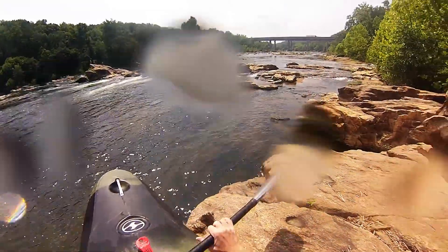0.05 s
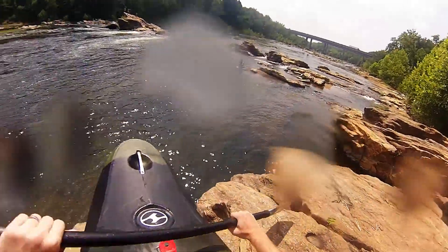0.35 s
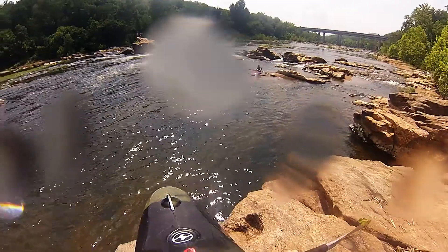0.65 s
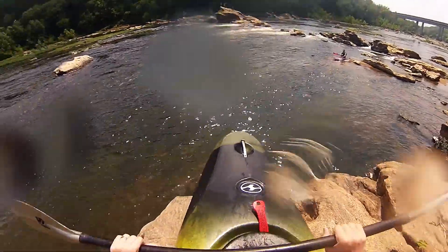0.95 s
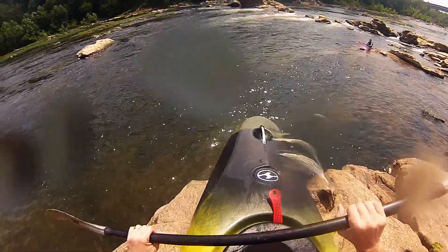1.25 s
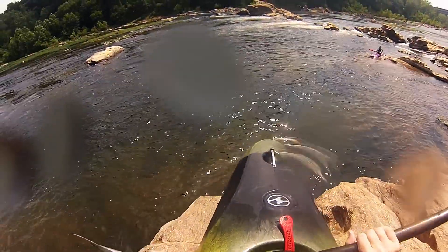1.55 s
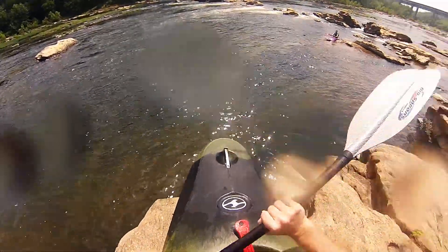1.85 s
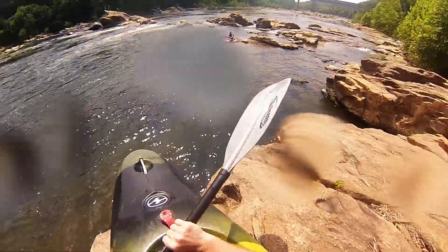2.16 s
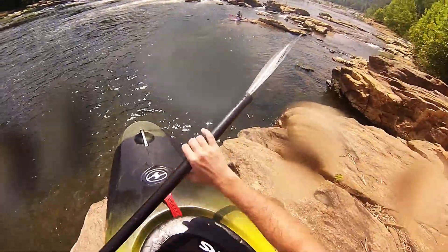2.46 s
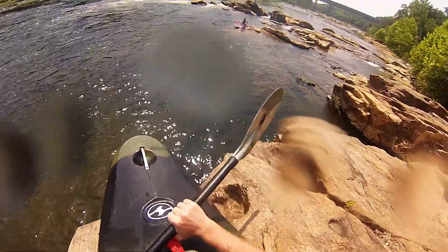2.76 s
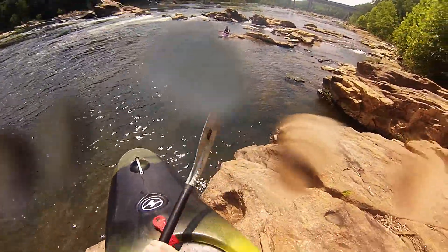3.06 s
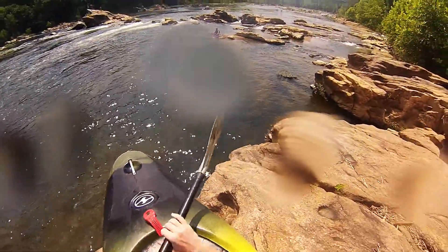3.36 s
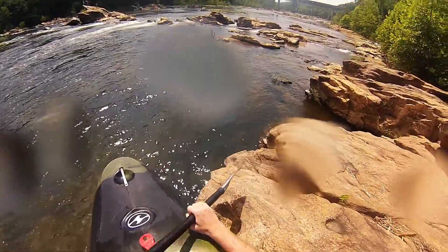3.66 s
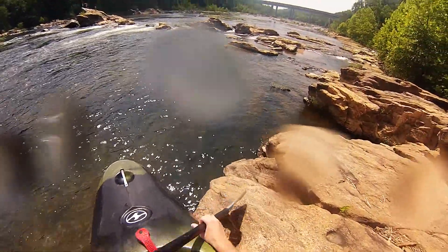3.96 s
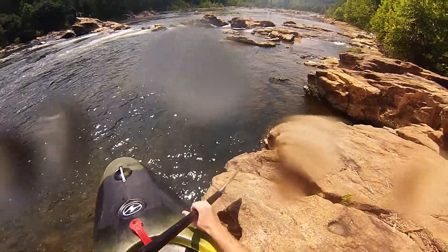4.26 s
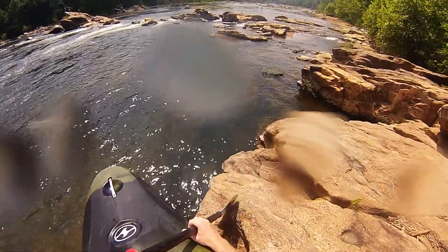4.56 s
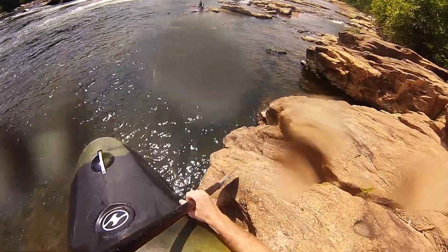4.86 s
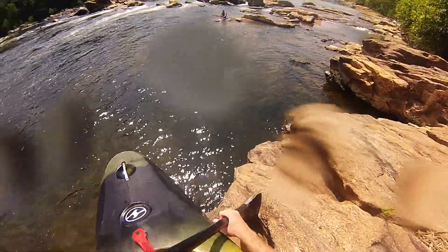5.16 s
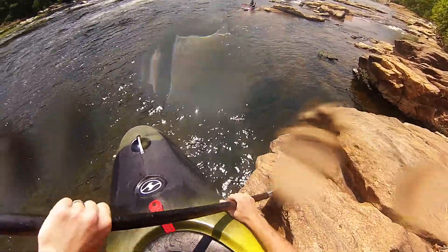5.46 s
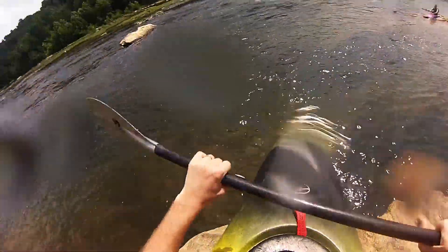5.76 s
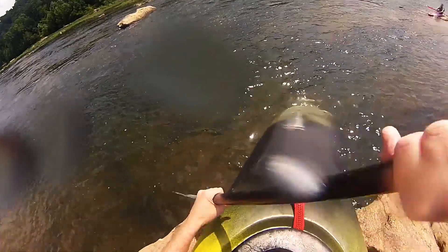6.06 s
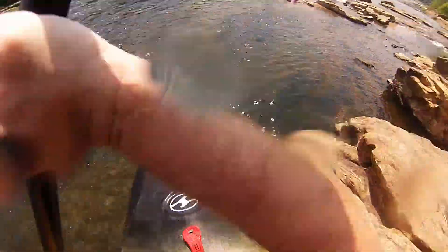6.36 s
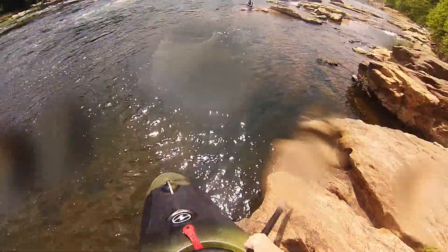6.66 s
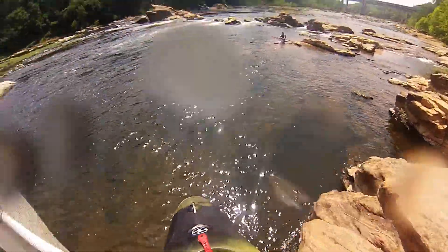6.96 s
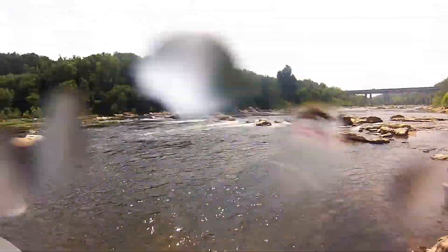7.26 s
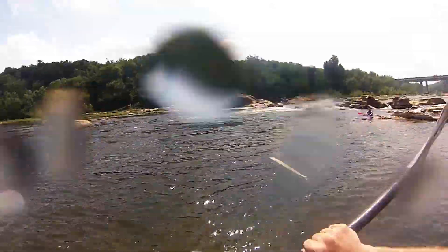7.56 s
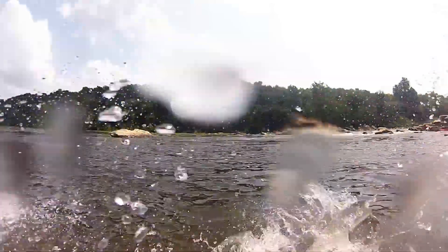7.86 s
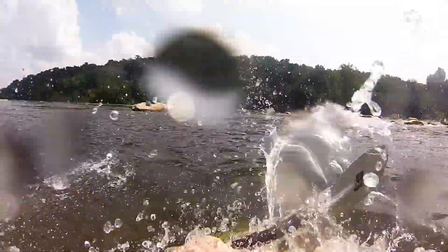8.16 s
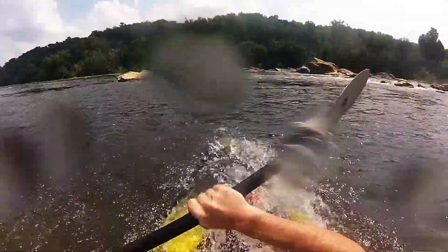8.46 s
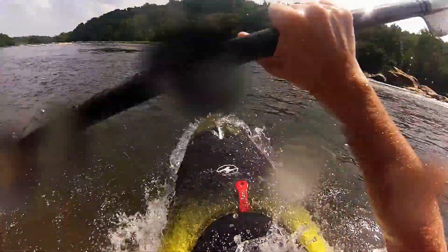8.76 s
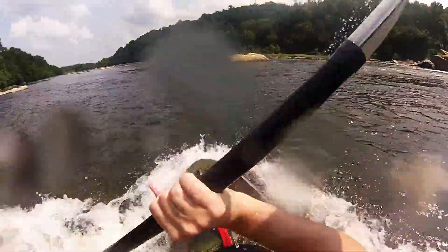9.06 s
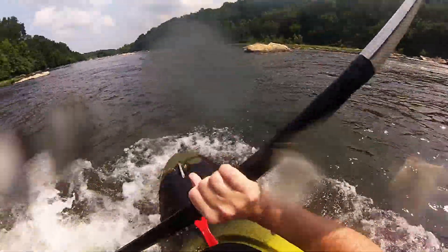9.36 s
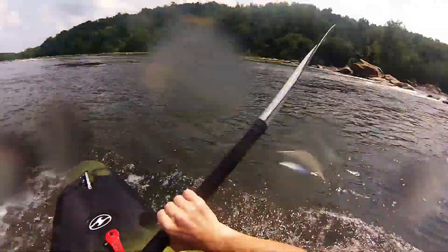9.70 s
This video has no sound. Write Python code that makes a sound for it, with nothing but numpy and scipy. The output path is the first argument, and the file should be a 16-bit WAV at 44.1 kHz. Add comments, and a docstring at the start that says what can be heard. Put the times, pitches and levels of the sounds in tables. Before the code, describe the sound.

Distant rapids rush steadily while wind rumbles on a close, boxy-sounding microphone. A paddle knocks and scrapes on a rock ledge in scattered clusters, with dull bumps. The knocks quicken as the plastic kayak grinds off the edge. Wind surges, and the boat hits the river with a loud splash, spray rapping on the microphone's case. The churned water foams and begins to settle.

```python
"""A plastic kayak is shoved off a rock ledge into a river, heard from a waterproof case on the paddler.
At first distant rapids rush and eddies of wind rumble on the case. The paddle knocks and scrapes on the
rock and the hull grinds along: impact and friction excite the damped modes of shaft, blade and hull.
Near 7.5 s the boat drops, the airflow peaks, and spray pelts the case and sets it ringing.
Last, the churned water foams with droplets and resonating bubbles, and settles."""
import sys
import numpy as np
from scipy import signal
from scipy.fft import rfft, irfft, next_fast_len
from scipy.io import wavfile

SR = 44100
rng = np.random.default_rng(int(sys.argv[2]) if len(sys.argv) > 2 else 0)


def master_out(mix):
    """Clip the mix to full scale and print it as 16-bit PCM to the path in sys.argv[1]."""
    frames = np.transpose(np.atleast_2d(mix))
    ceiling = np.clip(frames, -1, 1)
    pcm = np.round(ceiling * 32767).astype(np.int16)
    wavfile.write(sys.argv[1], SR, pcm)


N = 433503
TIME = np.arange(N) / SR

# Levels in the tables are relative; each source applies its own gain.
# blows on the rock: t/s, favoured shaft f/Hz, favoured blade f/Hz, level/dB of hull, shaft, blade, grit
KNOCKS = [(0.512, 1170, 2440, -58, -37, -41.5, -56.5), (0.604, 1290, 1920, -40, -46, -59, -67),
          (1.803, 1280, 2460, -59, -40, -42, -50.5), (1.933, 1220, 2310, -63, -38.5, -48, -49.5),
          (1.981, 930, 2180, -57, -40, -49, -50.5), (2.813, 1590, 2260, -45.5, -46.5, -53, -57),
          (2.874, 1030, 2260, -41, -34.5, -49, -51), (3.068, 1340, 2550, -68, -45.5, -50, -50.5),
          (3.172, 654, 2060, -58, -53, -62, -62), (4.645, 1120, 2050, -51, -36.5, -47, -63),
          (4.995, 1190, 2020, -44.5, -26, -31.5, -45.5), (5.041, 1160, 2060, -67, -44, -48, -63),
          (5.067, 1130, 2100, -65, -39, -45, -60), (5.084, 1110, 2180, -52, -43, -53, -69),
          (6.207, 1515, 2023, -46.5, -33, -34.5, -43.5), (6.31, 654, 2430, -49, -39.5, -40, -47.5),
          (6.418, 1590, 2410, -54, -34.5, -34, -41), (6.79, 1200, 2174, -46.5, -34, -42, -51),
          (6.941, 1149, 2090, -55, -36.5, -40, -52), (7.1, 1360, 3080, -55, -32, -32.5, -38)]
# slides on the rock: t/s, length/s, then frequencies and levels as for the blows
SCRAPES = [(1.816, 0.076, 1060, 2300, -70, -50, -54, -57), (1.885, 0.023, 1160, 2300, -64, -41, -41, -46.5),
           (1.983, 0.041, 930, 2170, -62, -47.5, -55, -57), (2.04, 0.085, 1500, 2170, -66, -62.5, -65, -69),
           (2.922, 0.081, 1627, 2297, -61, -44.5, -51, -49.5),
           (2.988, 0.04, 1290, 2300, -41.5, -47, -59, -64), (5.311, 0.14, 1150, 2100, -55, -57.5, -62, -74),
           (6.226, 0.063, 700, 2000, -51, -52, -57, -60), (6.312, 0.032, 1600, 2430, -55, -47, -46, -53),
           (6.363, 0.044, 1593, 2356, -52.5, -56, -47, -50), (6.415, 0.04, 1570, 2300, -56, -43, -42, -47),
           (6.458, 0.048, 1580, 2350, -58, -44, -37, -45),
           (6.819, 0.097, 1344, 2100, -48.5, -38, -39.5, -51),
           (6.967, 0.098, 1290, 2090, -55, -44, -47, -60), (7.17, 0.05, 1294, 2350, -59, -47, -53, -61),
           (7.234, 0.055, 1280, 2350, -40.5, -48.5, -47.5, -56),
           (7.3, 0.12, 1290, 2350, -66, -56, -60, -80)]
# modes of each part: f/Hz, bandwidth/Hz, level/dB
HULL_MODES = [(245, 220, -4.5), (323, 84, -4), (392, 77, -9.5), (634, 75, -8.5)]
SHAFT_MODES = [(706, 54, -6), (850, 57, -6), (929, 49, -6), (1071, 35, 0), (1149, 46, 0), (1299, 57, 1),
               (1423, 64, -2.5), (1602, 82, -4.5)]
BLADE_MODES = [(1932, 74, -1), (2091, 61, 4), (2332, 74, 1), (2570, 130, -0.5), (3140, 106, -7.5)]
GRIT_MODES = [(3320, 580, 1.5), (4220, 240, -1), (4730, 310, -2), (5750, 530, -6.5), (6420, 240, -4),
              (7840, 1500, -11), (11100, 2100, -18.5)]
CASE_MODES = [(1325, 184, -9), (1700, 114, -4), (2230, 178, 6.5), (2380, 247, 3.5), (3220, 190, -16.5)]
CASE_CRACK_MODES = [(6270, 550, -4), (7400, 610, -6.5), (11600, 1100, -19)]
PARTS = (HULL_MODES, SHAFT_MODES, BLADE_MODES, GRIT_MODES)
HULL_BOOM_HZ = 317  # the rock excites the hull most near here
# contact force on each part: rise/s, decay/s, knock gain/dB, scrape gain/dB
CONTACT = [(0.001, 0.0099, -2, -2), (0.00159, 0.0091, -4.5, 1.5), (0.00085, 0.0045, -3, -2),
           (0.00097, 0.0036, -3.5, -2)]
# water landing on the case: t/s, ring level/dB, slap level/dB, slap f/Hz, crack level/dB
DROPS = [(7.632, -27.5, -31, 1200, -41), (7.768, -16, -20, 600, -45), (7.7759, -10, -25, 900, -44),
         (7.784, -14, -34, 600, -45), (7.792, -5, -37, 700, -45), (7.7981, -19, -13, 570, -44),
         (7.7994, -2.5, -32, 830, -31), (7.813, -20, -40, 500, -50), (7.824, -21, -12, 460, -43),
         (7.83, -28, -23, 510, -45), (7.865, -25, -8, 322, -45), (7.867, -22, -15, 515, -41),
         (7.8772, -25, -15.5, 293, -38), (7.888, -16, -36, 400, -38), (7.894, -18.5, -37, 400, -32),
         (7.901, -25.5, -32, 800, -40), (8.001, -23.5, -42, 500, -45), (8.019, -28, -28.5, 200, -42),
         (8.18, -35, -28.5, 1510, -56), (8.3602, -13, -4, 1220, -15.5), (8.3608, 1, -24, 1790, -32),
         (8.374, -24, -51, 700, -33), (8.425, -16.5, -20, 453, -40), (8.428, -25, -22, 714, -44)]
# bow entry, hull landing, falling wave, foam: t/s, rise/s, hold/s, decay/s, wash level/dB, spray level/dB
SURGES = [(7.542, 0.068, 0.072, 0.066, -42.5, -55), (7.753, 0.018, 0.13, 0.03, -33, -49),
          (7.919, 0.092, 0.014, 0.011, -38.5, -50), (8.026, 0.28, 0.085, 0.35, -40.5, -52),
          (8.516, 0.12, 0.55, 0.38, -41, -52.5)]
# plinks and squeaks: t/s, level/dB, f/Hz
PLINKS = [(2.591, -47.5, 1284), (6.465, -44, 3550), (6.826, -51, 6700), (6.903, -30.5, 2075),
          (7.521, -43, 1160), (7.555, -35.5, 1250), (9.465, -45, 820)]
# dull bumps: t/s, level/dB, starting f/Hz, decay/s
BUMPS = [(1.251, -36, 93, 0.056), (2.355, -32, 103, 0.081), (2.78, -34.5, 85, 0.035),
         (3.43, -30.5, 87, 0.13), (4.326, -31.5, 192, 0.031), (4.467, -31, 97, 0.047),
         (5.537, -28, 138, 0.065), (7.248, -23, 129, 0.011), (7.28, -17.5, 134, 0.016),
         (7.454, -12, 104, 0.015), (7.685, -15, 97.5, 0.05), (7.822, -15, 260, .006),
         (7.865, -8, 228, 0.0075), (7.901, -12.5, 99, 0.033), (8.02, -10.5, 71, 0.011),
         (8.645, -24.5, 100, 0.05)]
# crackles of the case: t/s, level/dB
CRACKLES = [(7.196, -48), (7.255, -42), (7.286, -48), (7.426, -49), (7.435, -49), (7.458, -42.5)]
# airflow past the case: t/s, rumble level/dB
AIRFLOW = [(0.0, -30), (2.5, -30), (5.9, -29.5), (6.9, -21.5), (7.3, -16), (7.95, -15), (8.3, -18),
           (8.6, -27), (9.83, -33)]
# gusts: peak t/s, half width/s, rumble level/dB, flutter level/dB
GUSTS = [(0.41, 0.073, -22.5, -62), (0.7, 0.2, -27, -52), (1.94, 0.045, -22.5, -69),
         (2.96, 0.12, -23.5, -58), (4.0, 0.15, -24, -55), (5.0, 0.082, -22, -62), (5.4, 0.21, -24, -60),
         (6.27, 0.12, -18.5, -62), (6.43, 0.051, -9, -43), (7.16, 0.044, -13, -56), (7.268, 0.028, -7, -29),
         (7.46, 0.014, -7.5, -41), (7.7, 0.03, -17, -36), (7.86, 0.051, -13, -32), (8.02, 0.017, -7, -36),
         (8.3, 0.12, -22, -46), (8.43, 0.027, -13, -39), (8.74, 0.14, -23.5, -44), (9.23, 0.08, -30, -57)]
# the background level ducks briefly after a heavy low thump, then recovers: t/s, level/dB
BACKGROUND_DIP = [(7.3, -2.5), (7.46, 0.5), (7.48, -16), (7.505, -4), (7.53, -1)]
# noise spectra: f/Hz, density level/dB
WASH_SPECTRUM = [(88, -6), (170, -5), (260, -4), (380, -4), (550, -6), (900, -5), (1120, 0), (1290, 2.5),
                 (1500, -1.5), (1800, -7), (2350, -3), (2900, -9.5), (4000, -22), (6000, -71)]
SPRAY_SPECTRUM = [(1900, -21), (3300, -1.5), (4400, -3.5), (5600, -3.5), (6800, -6.5), (7900, -7.5),
                  (9200, -15.5), (11500, -16), (13400, -20), (15500, -29)]
RUMBLE_SPECTRUM = [(10, 4), (22, 8), (42, -3.5), (60, -16), (90, -26.5), (200, -50.5), (500, -99)]
FLUTTER_SPECTRUM = [(30, -41), (80, -3), (150, -2.5), (300, -11.5), (600, -20), (1500, -53)]
TEAR_SPECTRUM = [(60, -20), (300, -4), (1200, -5), (2400, -9), (4000, -17), (14000, -36)]
RAPIDS_SPECTRUM = [(88, -60), (150, -7.5), (230, -14.5), (258, -11), (509, -12), (844, -13.5), (966, -15),
                   (1270, -9), (1700, -19), (2270, -15.5), (2450, -20.5), (3280, -25.5), (11400, -34.5),
                   (14600, -36), (15500, -51)]
HISS_SPECTRUM = [(300, -22), (3000, 0), (8000, 3), (15000, -4)]
# likeness of left and right: f/Hz, coherence
COHERENCE = [(100, .995), (400, .995), (1200, .997), (2400, .993), (6000, .92), (15000, .85)]


def knocks(span_s=0.021):
    """Impact excitation: each blow on the rock rings hull, shaft, blade and grit together."""
    out = np.zeros(N)
    for start, shaft_hz, blade_hz, *levels in KNOCKS:
        for modes, db, (rise, decay, trim_db, _) in zip(PARTS, levels, CONTACT):
            modes = favour(modes, (HULL_BOOM_HZ, shaft_hz, blade_hz), boost_db=7)
            sound = strike(modes, rise, decay, blow=0.49, tail_db=-19)
            add(out, start - .002, gain_of(db + trim_db) * np.sqrt(span_s) * sound)
    return out


def scrapes(slide_db=-4, catch_db=-2, catch_gap_s=.013, bite_share=0.19, ease_db=-3, release_s=0.008):
    """Stick-slip friction: rock grains give a steady rasp while the edge catches in uneven blows."""
    out = np.zeros(N)
    for start, length, shaft_hz, blade_hz, *levels in SCRAPES:
        t = np.arange(0, length + 2 * np.pi * release_s, 1 / SR)
        bite = np.minimum(t / (bite_share * length), 1)
        release = np.exp(-np.maximum(t - length, 0) / release_s)
        pressure = bite * gain_of(ease_db * t / length) * release
        rasp = grains(SR // 2, per_s=3000, spread_db=1.5)[:len(t)]
        catches = np.arange(0, t[-1], catch_gap_s)
        shift, force = rng.standard_normal((len(catches), 2)).T
        catches = catches + 0.27 * catch_gap_s * shift
        weights = np.interp(catches, t, pressure) * gain_of(catch_db + 2.2 * force) * np.sqrt(catch_gap_s)
        for modes, db, (rise, decay, _, trim_db) in zip(PARTS, levels, CONTACT):
            modes = favour(modes, (HULL_BOOM_HZ, shaft_hz, blade_hz), boost_db=6.5)
            add(out, start, gain_of(db + trim_db + slide_db) * pressure * unit_rms(ring(rasp, modes)))
            for at, size in zip(catches, gain_of(db + trim_db) * weights):
                catch = strike(modes, rise, 0.64 * decay, blow=0.46, tail_db=-28)
                add(out, start + at - rise, size * catch)
    return out


def strike(modes, rise, decay, blow, tail_db, tail_s=0.029):
    """Forced response, at unit energy, to an impulse and brief chatter on stone with a faint tail."""
    t = np.arange(SR // 8) / SR
    fade = np.exp(-t / decay) + gain_of(tail_db) * np.exp(-t / tail_s)
    force = rng.standard_normal(len(t)) * (1 - np.exp(-t / rise)) * fade
    force[round(rise * SR)] += blow * np.linalg.norm(force)
    sound = ring(force, loaded(modes))
    return sound * np.sqrt(SR / np.sum(sound ** 2))


def favour(modes, centres_hz, boost_db, octaves=0.1):
    """Modal coupling: a blow lifts the modes that move most where it lands, those near centres_hz."""
    nearness = [np.exp(-(np.log2(hz / np.array(centres_hz)) / octaves) ** 2).max() for hz, _, _ in modes]
    return [(hz, width, db + boost_db * near) for (hz, width, db), near in zip(modes, nearness)]


def loaded(modes, vary_db=2, detune=.012):
    """Contact loading: each touch shifts the modes a little in frequency and level."""
    chance = rng.standard_normal((len(modes), 2))
    return [(hz * (1 + detune * a), width, db + vary_db * b)
            for (hz, width, db), (a, b) in zip(modes, chance)]


def ring(force, modes):
    """Modal superposition: the force is convolved with damped sinusoids of alternating sign."""
    t = np.arange(SR // 16) / SR
    response = sum((-1) ** k * gain_of(db) * width * np.exp(-np.pi * width * t)
                   * np.sin(2 * np.pi * hz * t) for k, (hz, width, db) in enumerate(modes))
    return signal.fftconvolve(force, response)[:len(force)]


def ledge_echo(sound, delays_s=(0.00206, 0.00285), echo_db=-29.5):
    """Early reflection: a faint echo off the rock follows the direct sound, left before right."""
    out = np.array([sound, sound])
    for ear, delay in zip(out, delays_s):
        add(ear, delay, gain_of(echo_db) * sound)
    return out


def drops(patter=.25, patter_s=0.0029, slap_s=0.00029):
    """Liquid impact: a sharp push and brief patter ring the case, and the mass of water slaps it."""
    out, t = np.zeros(N), np.arange(SR // 20) / SR
    for start, ring_db, slap_db, slap_hz, crack_db in DROPS:
        force = patter * rng.standard_normal(len(t)) * np.exp(-t / patter_s) / np.sqrt(patter_s * SR)
        force[0] += 1
        body, crack = ring(force, CASE_MODES), ring(force, CASE_CRACK_MODES)
        slap = np.gradient(t ** 2 * np.exp(-t / slap_s) * np.sin(2 * np.pi * slap_hz * t))
        for db, sound in (ring_db, body), (crack_db, crack), (slap_db, slap):
            add(out, start, gain_of(db) * sound / abs(sound).max())
    return out


def splash(spray_gain_db=1.0, bubble_db=-14, flicker_db=1.2):
    """Incoherent addition: surges of dense droplets, bubbles and fizzing foam sum in power."""
    wash_level, spray_level = np.zeros((2, N))
    for start, rise, hold, decay, wash_db, spray_db in SURGES:
        age = TIME - start
        swell = np.clip(age / rise, 0, 1) * np.exp(-np.maximum(age - rise - hold, 0) / decay)
        wash_level = np.hypot(wash_level, gain_of(wash_db) * swell)
        spray_level = np.hypot(spray_level, gain_of(spray_db) * swell)
    wash = near_mono(grains((2, N), per_s=6000, spread_db=2.5), WASH_SPECTRUM)
    wash += gain_of(bubble_db) * coloured(bubbles(), WASH_SPECTRUM)
    spray = near_mono(grains((2, N), per_s=16000, spread_db=4.0), SPRAY_SPECTRUM)
    flicker = gain_of(flicker_db * wander(rate_hz=45))
    return flicker * (wash_level * wash + gain_of(spray_gain_db) * spray_level * spray)


def bubbles(per_s=14, cycles=12, glide=0.14, sizes=24):
    """Bubble resonance: air pockets ring briefly, rising in pitch as they near the surface."""
    out, t = np.zeros(N), np.arange(SR // 16) / SR
    start = int(SURGES[0][0])
    for hz in np.geomspace(700, 2800, sizes):
        age = t * hz / cycles
        pop = np.sin(2 * np.pi * hz * t * (1 + glide * age / 2)) * np.exp(-2 * age)
        births = grains(N - start * SR, per_s=per_s, spread_db=1.0)
        add(out, start, signal.oaconvolve(births, pop))
    return out


def plinks(rise_s=0.0046):
    """Damped sinusoids with soft onsets sound among the scraping and the water."""
    out, t = np.zeros(N), np.arange(SR // 12) / SR
    envelope = t / rise_s * np.exp(1 - t / rise_s)
    for start, db, hz in PLINKS:
        add(out, start, gain_of(db) * envelope * np.sin(2 * np.pi * hz * t))
    return out


def bumps(rest_hz=42, sink_s=0.011, rise_s=0.0036):
    """Damped oscillation: soft pushes on the case give low tones that sink into the rumble."""
    out, t = np.zeros(N), np.arange(SR // 4) / SR
    for start, db, hz, decay in BUMPS:
        turns = np.cumsum(rest_hz + (hz - rest_hz) * np.exp(-t / sink_s)) / SR
        envelope = (1 - np.exp(-t / rise_s)) * np.exp(-t / decay)
        add(out, start, gain_of(db) * envelope * np.sin(2 * np.pi * turns))
    return out


def crackles(decay_s=0.006, gain_db=3, cutoff_hz=5000):
    """Impulsive noise: the case ticks in thin bursts during the strongest gusts."""
    out, t = np.zeros(N), np.arange(SR // 30) / SR
    lowpass = signal.butter(1, cutoff_hz, fs=SR)
    for start, db in CRACKLES:
        ticks = signal.lfilter(*lowpass, grains(len(t), per_s=4200, spread_db=7.0))
        add(out, start, gain_of(db + gain_db) * unit_rms(ticks) * np.exp(-t / decay_s))
    return out


def wind(gain_db=-3, calm_db=-60, breakup_db=-24, flutter_slope=1.97, strong_db=-42, tear_db=-58):
    """Turbulent pressure: eddies rumble and flutter on the case; strong gusts tear at its ports."""
    t = np.arange(0, N, SR // 1000) / SR
    flow_db = np.interp(t, *np.transpose(AIRFLOW))
    rumble_power = gain_of(flow_db) ** 2
    # above the breakup level, flutter grows faster than rumble
    flutter_power = gain_of(calm_db + flutter_slope * np.maximum(flow_db - breakup_db, 0)) ** 2
    for peak, width, rumble_db, flutter_db in GUSTS:
        bell = np.exp(-((t - peak) / width) ** 2)
        rumble_power += gain_of(rumble_db) ** 2 * bell
        flutter_power += gain_of(flutter_db) ** 2 * bell
    rumble_power, flutter_power = np.interp(TIME, t, rumble_power), np.interp(TIME, t, flutter_power)
    # strong flutter drives left and right apart
    apart = np.minimum(flutter_power / gain_of(strong_db) ** 2, 1) * np.array([[1], [-1]])
    eddies = unit_rms(gain_of(2.5 * wander(rate_hz=8)))
    lumps = unit_rms(gain_of(1.5 * wander(rate_hz=16)))
    mid, side = coloured(rng.standard_normal((2, N)), RUMBLE_SPECTRUM)
    rumble = gain_of(gain_db) * np.sqrt(rumble_power) * (mid + gain_of(-21) * apart * side)
    mid, side = coloured(rng.standard_normal((2, N)), FLUTTER_SPECTRUM)
    flutter = gain_of(gain_db) * np.sqrt(flutter_power) * (mid + gain_of(-7) * apart * side)
    tear = gain_of(tear_db) * apart * coloured(rng.standard_normal((2, N)), TEAR_SPECTRUM)
    return eddies * rumble + lumps * (flutter + tear)


def rapids(level_db=-55.48, swell_db=.35):
    """Filtered broadband noise: far white water is an even rush, boxy through the case."""
    level = gain_of(level_db + swell_db * wander(rate_hz=8))
    return level * near_mono(rng.standard_normal((2, N)), RAPIDS_SPECTRUM)


def hiss(level_db=-74.5):
    """Self-noise: each microphone adds its own faint hiss."""
    return gain_of(level_db) * coloured(rng.standard_normal((2, N)), HISS_SPECTRUM)


def grains(shape, per_s, spread_db):
    """Shot noise: random clicks, mostly small and a few large."""
    size = gain_of(spread_db * np.minimum(rng.exponential(1, shape), 4))
    return unit_rms(size * rng.choice([-1, 1], shape) * (rng.random(shape) < per_s / SR))


def wander(rate_hz):
    """Low-passed noise: a slow random fluctuation of rms 1."""
    size = next_fast_len(N)
    hz = np.fft.rfftfreq(size, 1 / SR)
    lowpass = np.exp(-np.minimum((hz / rate_hz) ** 2, 20 * np.pi))
    return unit_rms(irfft(rfft(rng.standard_normal(size)) * lowpass, size)[:N])


def coloured(x, spectrum):
    """Spectral shaping: filters a signal by a spectrum, at rms 1."""
    size = next_fast_len(N)
    response = gain_of(value_at(spectrum, np.fft.rfftfreq(size, 1 / SR)))
    return unit_rms(irfft(rfft(x, size) * response, size)[..., :N])


def near_mono(pair, spectrum):
    """Partial coherence: two independent signals are coloured and blended into left and right."""
    size = next_fast_len(N)
    hz = np.fft.rfftfreq(size, 1 / SR)
    coherence = np.clip(value_at(COHERENCE, hz), 0, 1)
    blend = np.sqrt([1 + coherence, 1 - coherence])
    mid, side = rfft(pair, size) * blend * gain_of(value_at(spectrum, hz))
    return unit_rms(irfft([mid + side, mid - side], size)[:, :N])


def value_at(points, hz):
    """Interpolation on a log-frequency axis."""
    f, value = np.transpose(points)
    return np.interp(np.log(hz + 1), np.log(f + 1), value)


def gain_of(db):
    """Amplitude ratio of a level in decibels."""
    return 10 ** (np.asarray(db) / 20)


def unit_rms(x):
    """Normalisation to rms 1."""
    return x / np.sqrt(np.mean(x ** 2) + 1e-20)


def add(mix, start_s, sound):
    """Superposition of a sound on the mix from start_s."""
    part = mix[max(round(start_s * SR), 0):][:len(sound)]
    part += sound[:len(part)]


def scene():
    """Superposition: all arrives through the case, nearly in mono; each port crackles on its own."""
    dip = gain_of(np.interp(TIME, *np.transpose(BACKGROUND_DIP)))
    background = dip * (hiss() + rapids() + wind())
    case = bumps() + np.array([crackles(), crackles()])
    contacts = ledge_echo(knocks() + scrapes() + drops())
    return contacts + splash() + plinks() + case + background


def record(dry, edge_hz=15600):
    """Saturation and band limiting: clipping at full scale, then a steep low-pass."""
    lowpass = signal.firwin(401, edge_hz, window=("kaiser", 9), fs=SR)
    return signal.oaconvolve(np.clip(dry, -1, 1), lowpass[None], "same")


dry = scene()
out = record(dry)
master_out(out)
```